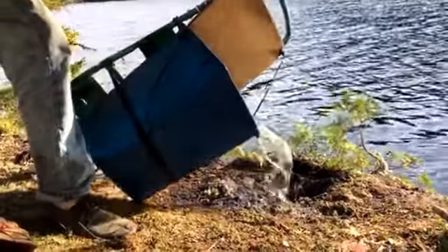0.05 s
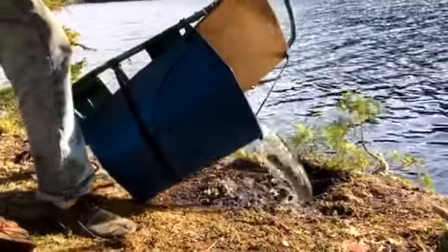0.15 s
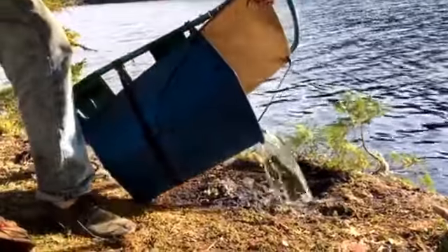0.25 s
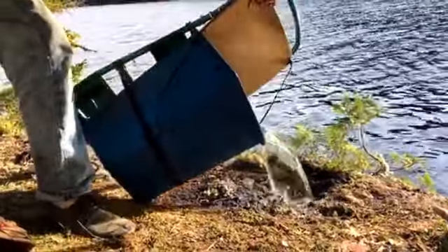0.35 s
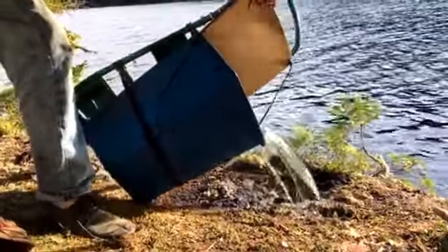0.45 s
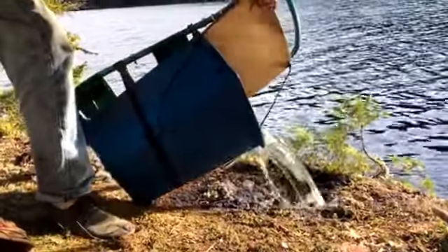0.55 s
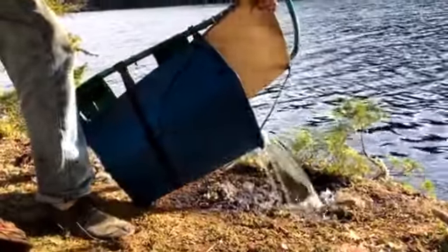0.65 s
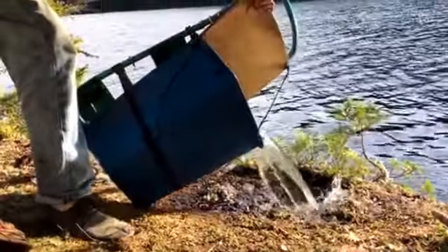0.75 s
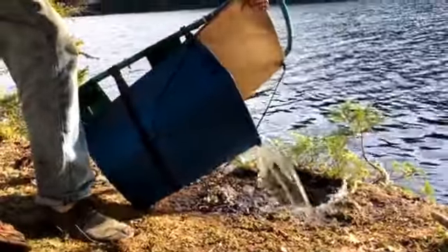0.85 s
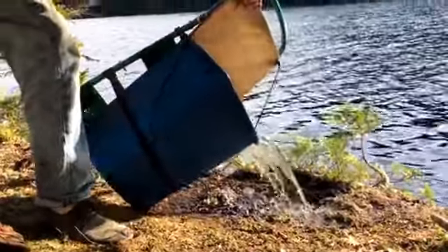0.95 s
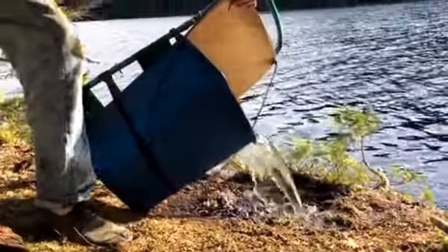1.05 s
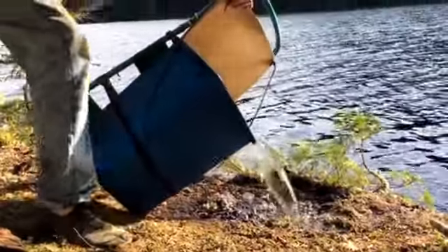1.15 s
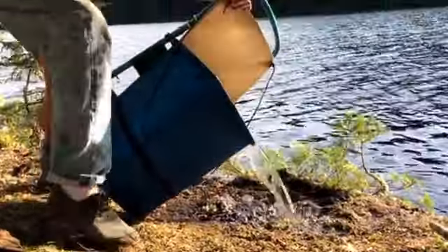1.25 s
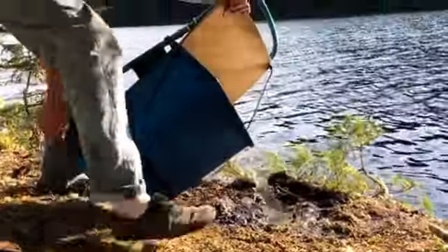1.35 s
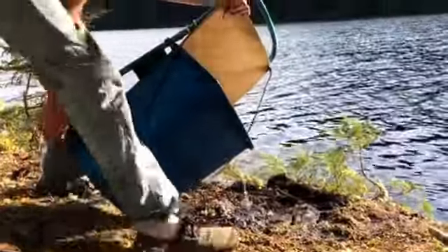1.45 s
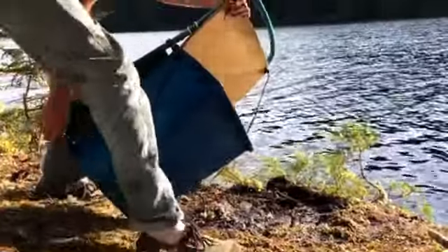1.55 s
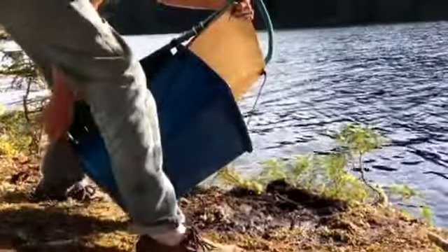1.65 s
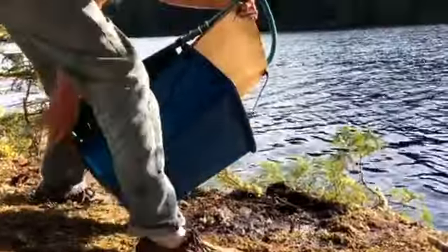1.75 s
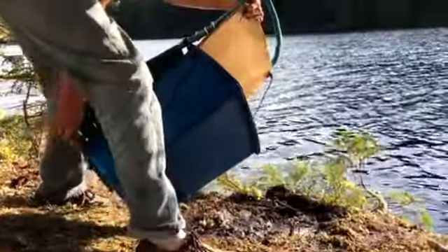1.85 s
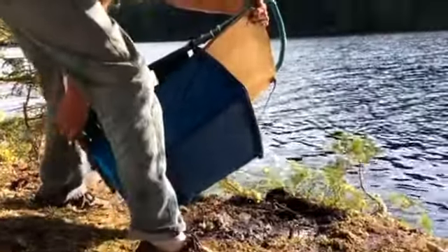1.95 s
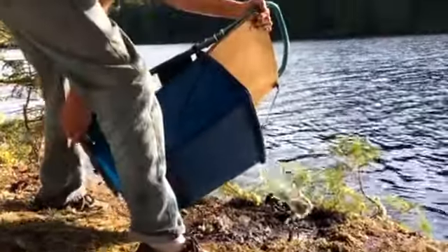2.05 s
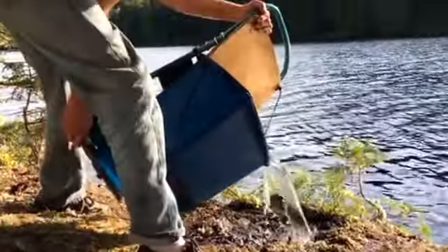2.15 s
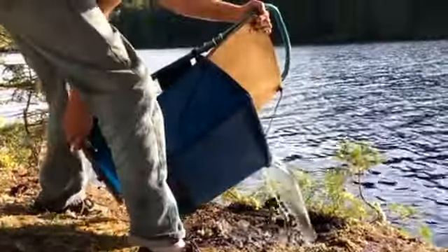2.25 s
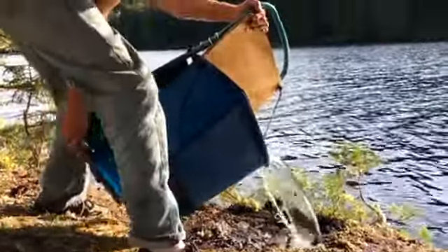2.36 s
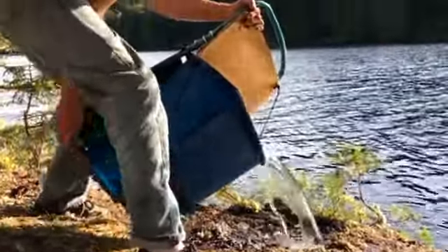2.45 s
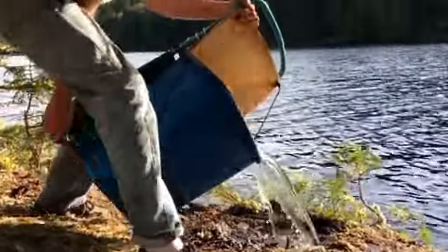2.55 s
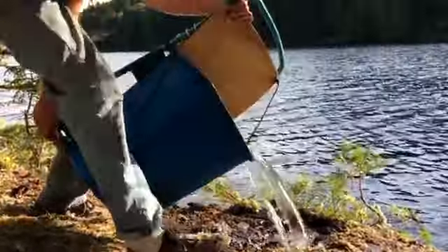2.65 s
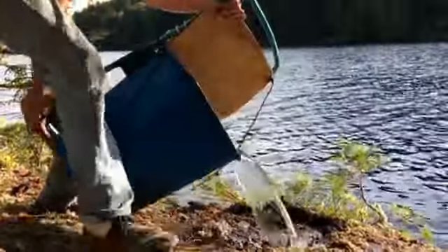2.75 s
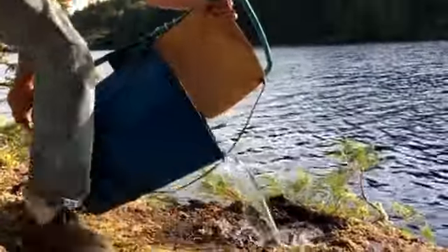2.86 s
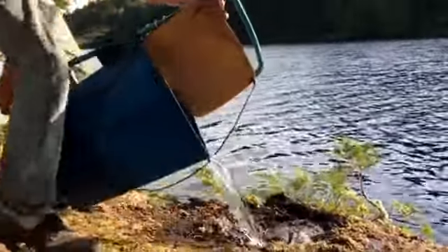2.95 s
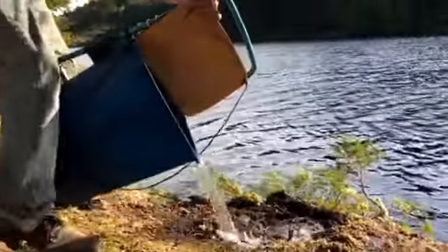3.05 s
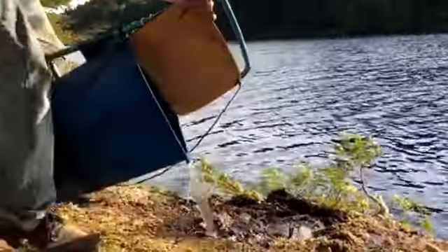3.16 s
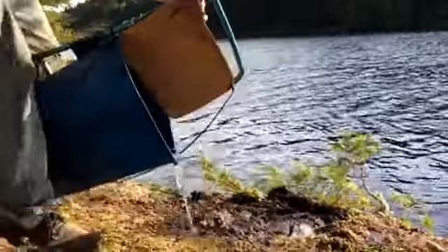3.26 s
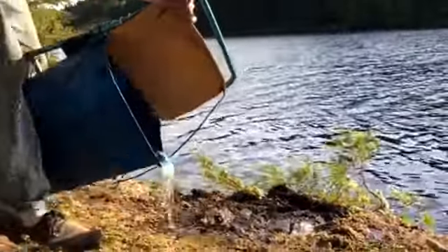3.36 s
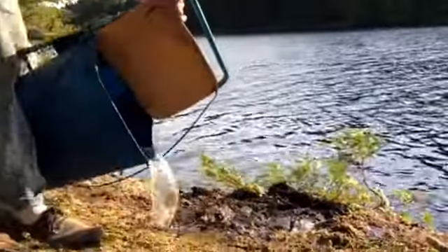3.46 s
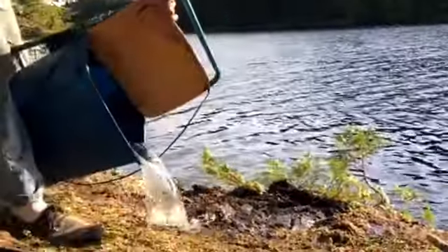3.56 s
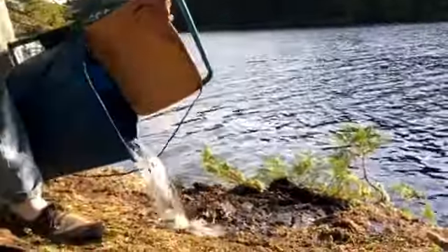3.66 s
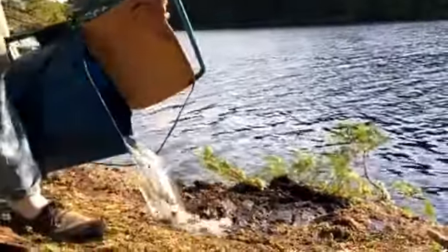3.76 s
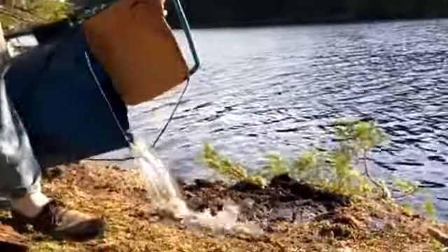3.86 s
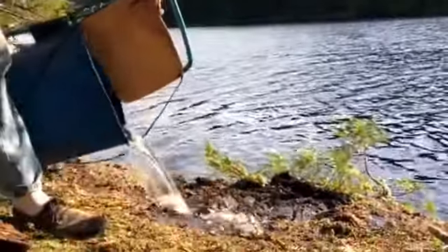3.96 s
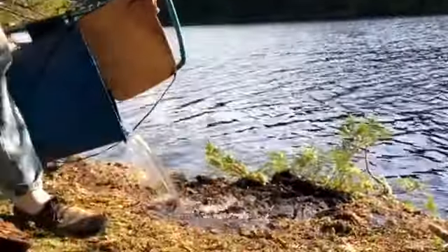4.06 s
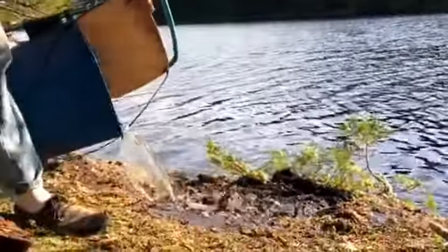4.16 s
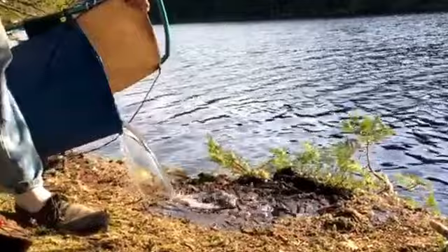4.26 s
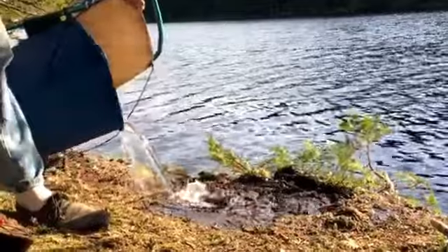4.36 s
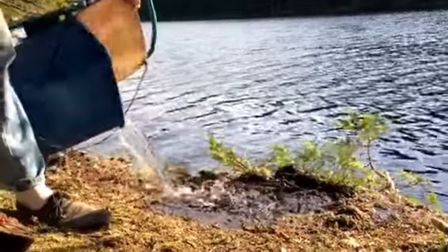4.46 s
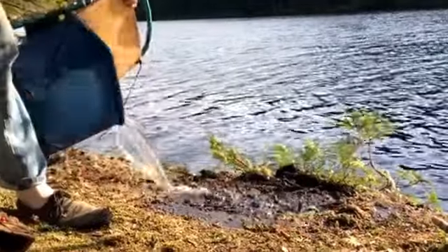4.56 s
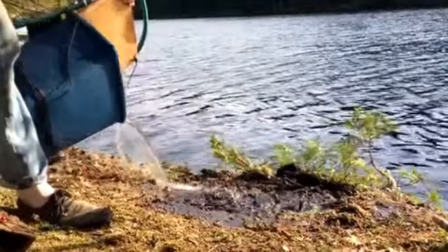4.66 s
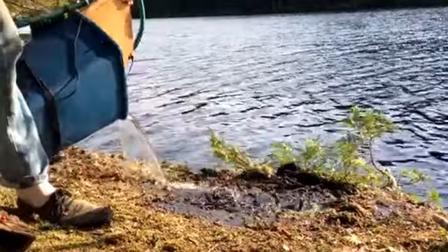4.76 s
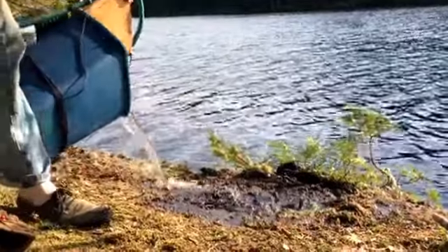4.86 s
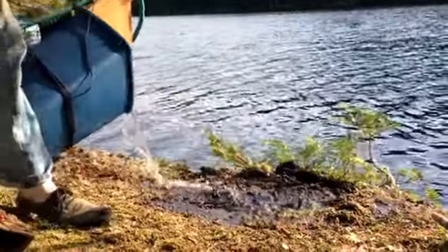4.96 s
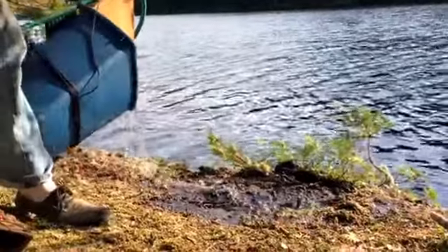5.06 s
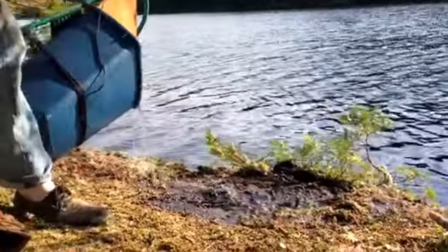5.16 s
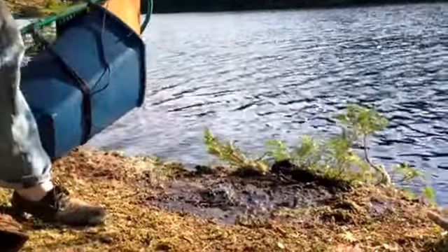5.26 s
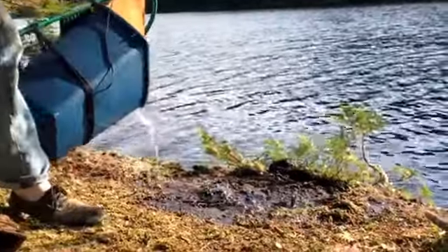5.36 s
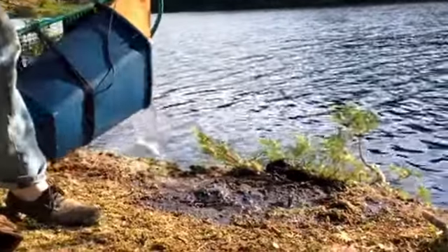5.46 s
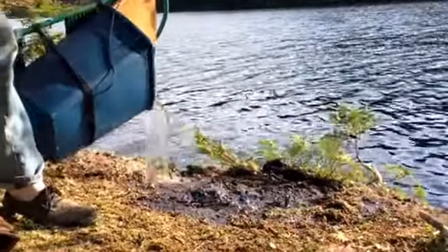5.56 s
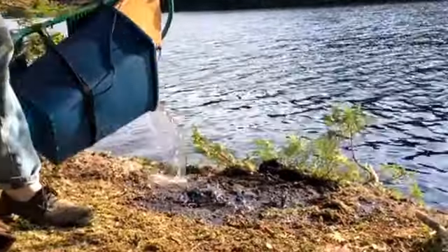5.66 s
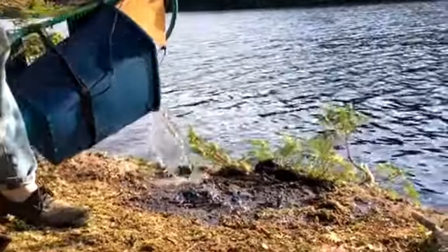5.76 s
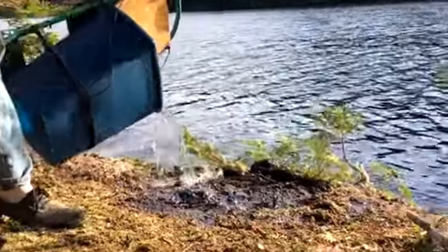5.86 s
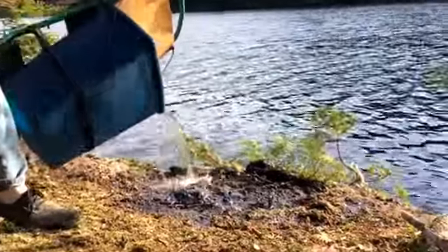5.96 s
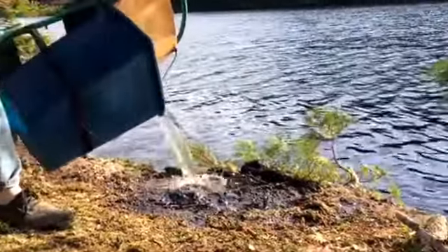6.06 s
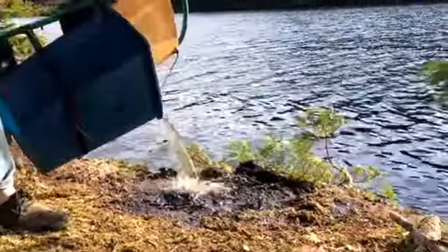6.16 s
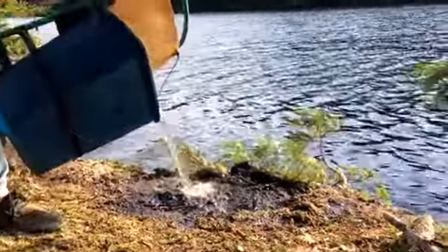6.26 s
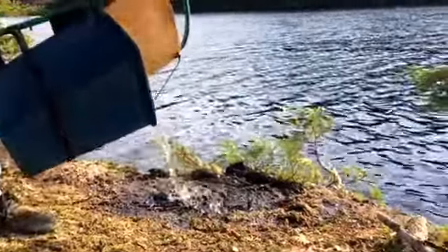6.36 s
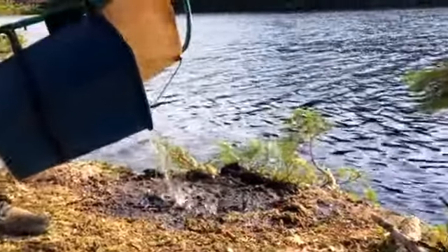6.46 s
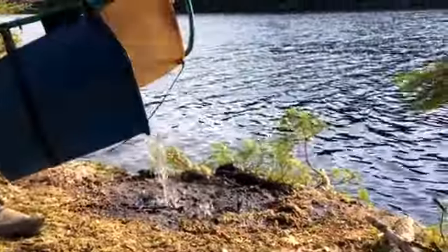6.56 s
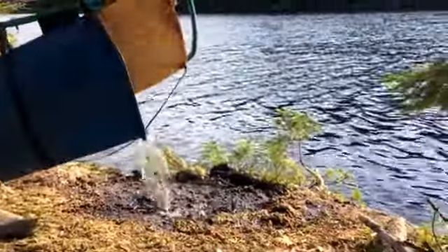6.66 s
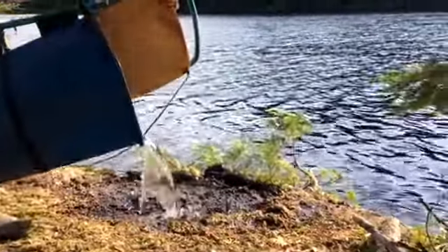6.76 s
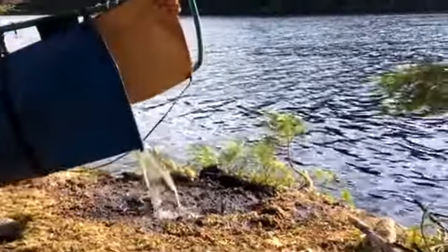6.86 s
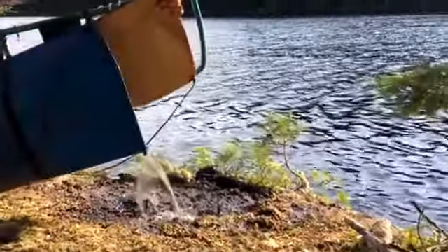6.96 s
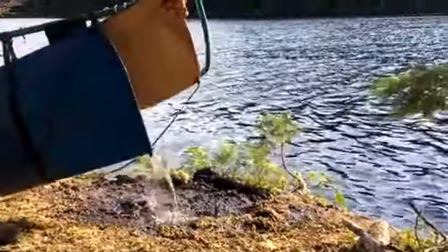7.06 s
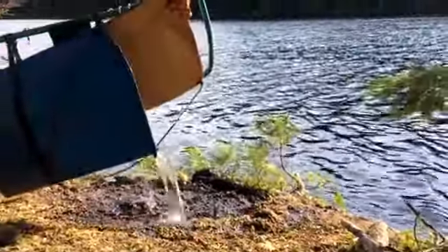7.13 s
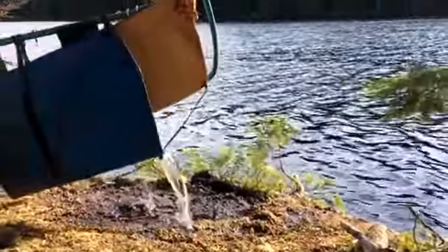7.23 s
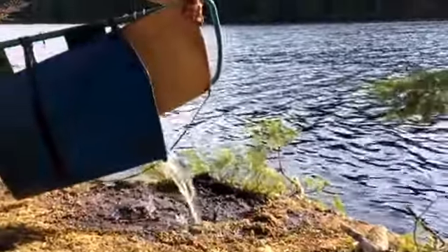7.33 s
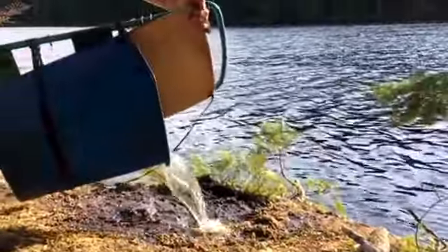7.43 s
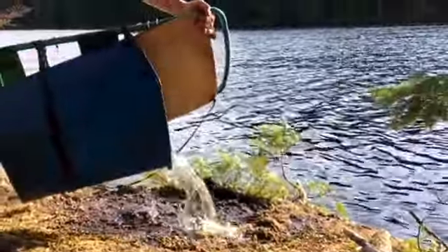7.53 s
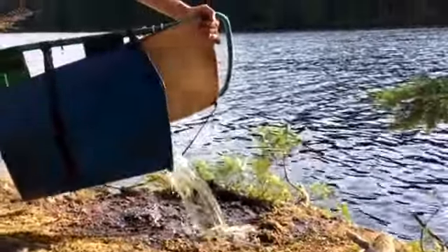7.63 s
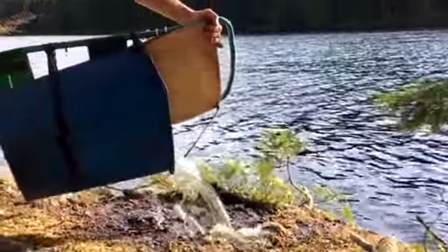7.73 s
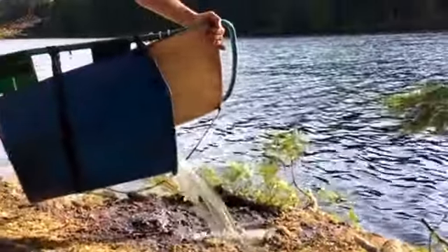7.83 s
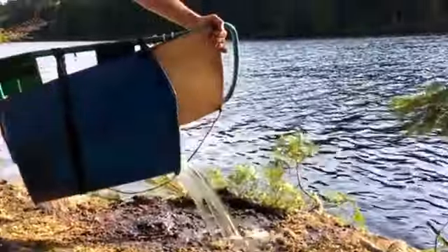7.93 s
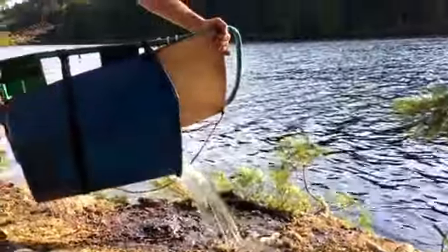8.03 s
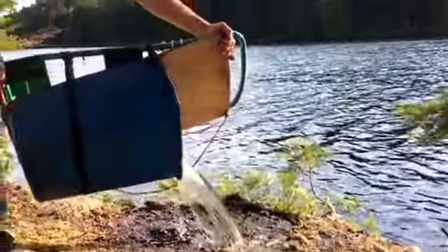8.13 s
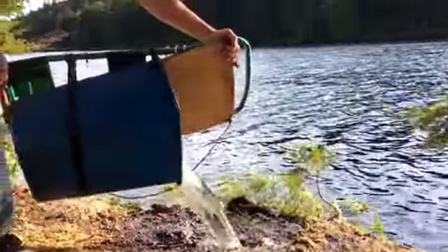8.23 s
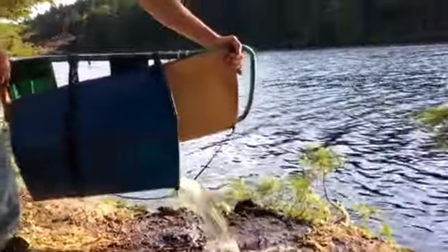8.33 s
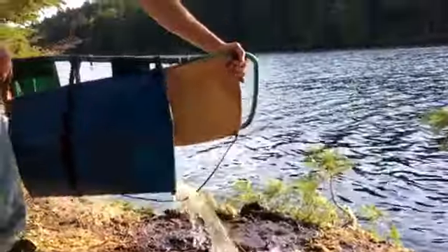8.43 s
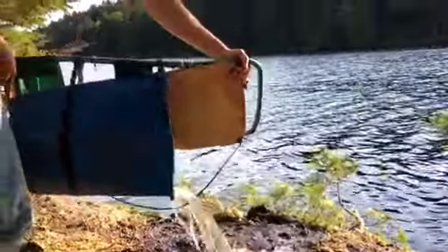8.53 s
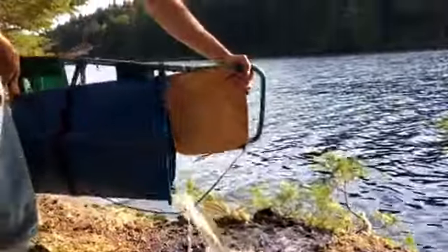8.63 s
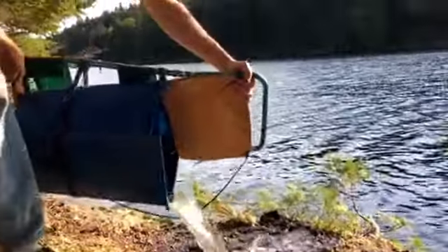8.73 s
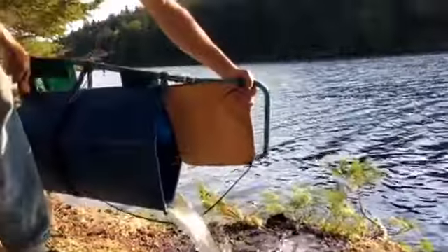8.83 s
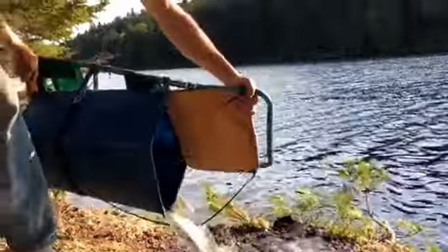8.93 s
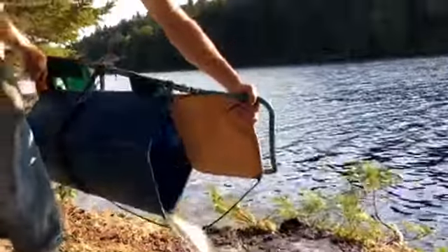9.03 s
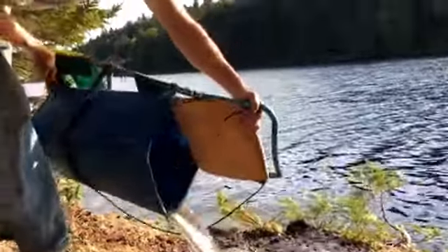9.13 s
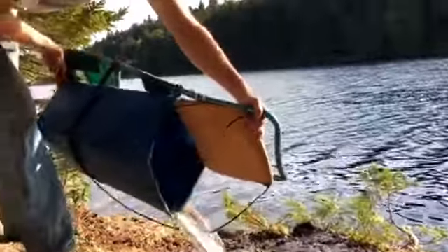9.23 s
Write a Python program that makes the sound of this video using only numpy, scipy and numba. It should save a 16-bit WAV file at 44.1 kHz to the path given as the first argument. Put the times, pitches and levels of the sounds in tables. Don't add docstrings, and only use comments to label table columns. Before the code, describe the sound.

Outdoors on a dry, open lake shore, water is tipped from a large box onto wet ash and mud about two metres away. From 0 to 1.5 s a modest, spattering stream bubbles and patters, then thins to drips and near silence by 1.8 s. At 2.2 s a sharp wet slap opens a fuller, gurgling surge, with a low bump at 2.9 s; it dwindles to plops by 3.4 s. A third pour runs from 3.5 to 5.1 s, then sparse ticks and drips. A deep bump at 5.4 s precedes the fourth, lively with big plops around 5.6-6.2 s, breaking into scattered drops until 7.2 s. After a light double bump at 7.3 s, the fifth pour builds, fullest near 8.7 s, and continues to 9.29 s, where one short, hard knock lands. Faint wind and handling thuds and a very quiet ripple hiss remain underneath.

```python
import sys
import numpy as np
from scipy import signal
from scipy.fft import rfft, irfft
from scipy.io import wavfile
from scipy.ndimage import uniform_filter1d
from numba import njit

SR = 44100
rng = np.random.default_rng(int(sys.argv[2]) if len(sys.argv) > 2 else 0)


def wrap_up_sound(samples):
    columns = np.atleast_2d(samples).T
    tamed = np.clip(columns, -1, 1)
    steps = np.round(tamed * 32767).astype(np.int16)
    wavfile.write(sys.argv[1], SR, steps)


def amplitude_ratio(level_db):
    exponent = np.asarray(level_db, float) / 20
    return 10 ** exponent


N = 409688


def curve(table, column):
    rows = np.array(table)
    return np.interp(np.arange(N) / SR, rows[:, 0], rows[:, column])


def sample_at(seconds):
    return (seconds * SR).astype(np.int64)


def unit(x):
    return x / np.sqrt(np.mean(x ** 2))


def smooth_twice(x, size):
    return uniform_filter1d(uniform_filter1d(x, size), size)


def colour(x, points):
    hz, db = np.transpose(points)
    f = np.maximum(np.fft.rfftfreq(len(x), 1 / SR), 1)
    gain_db = np.interp(np.log(f), np.log(hz), db)
    return irfft(rfft(x) * amplitude_ratio(gain_db), len(x))


def walk(rate):
    hold = int(SR / rate)
    steps = np.repeat(rng.standard_normal(N // hold + 1), hold)
    return unit(smooth_twice(steps, hold)[:N])


def bumps(peak_s, length_s, size, rise):
    out, t = np.zeros(N), np.arange(N) / SR
    for s, long, height in zip(peak_s, length_s, size):
        near = slice(max(int((s - 4 * long) * SR), 0), int((s + 4 * long) * SR))
        lag = (t[near] - s) / long
        lag = np.where(lag < 0, lag / rise, lag)
        out[near] += height * np.exp(-lag ** 2)
    return out


@njit
def ring(start, hz, cycles, rise, size, length):
    out = np.zeros(length)
    for k in range(len(start)):
        step = 2 * np.pi * hz[k] / SR
        life = cycles[k] * SR / hz[k]
        fade, glide = np.exp(-2 / life), np.exp(rise[k] / life)
        gain, phase, swell = size[k], 0., 1.
        for i in range(start[k], min(length, start[k] + int(3 * life))):
            out[i] += gain * (1 - swell) * np.sin(phase)
            phase += step
            swell *= 1 - step / 10
            step = min(step * glide, 2.8)
            gain *= fade
    return out


# [f/Hz, level/dB per Hz]
WIND_COLOUR = [(20, -11.5), (35, -9), (55, 1.5), (80, -2.5), (110, -13.5), (160, -17), (250, -33),
               (500, -50)]
# [f/Hz, level/dB]
RIPPLE_COLOUR = [(80, -30), (120, -2), (160, -5), (230, -9), (320, -12), (450, -16), (1620, -24.5),
                 (4880, -37.5), (6110, -28.5), (16000, -34)]
# [peak t/s, length/s, peak level/dB]
GUSTS = [(1.084, 0.057, -54.5), (1.42, 0.16, -65), (2.967, 0.058, -55), (3.139, 0.016, -58),
         (3.32, 0.045, -62), (3.88, 0.046, -65), (4.083, 0.025, -65), (5.441, 0.028, -42),
         (6.328, 0.025, -53), (6.56, 0.16, -44.5), (6.682, 0.081, -59), (7.615, 0.039, -59),
         (8.037, 0.045, -65), (8.66, 0.037, -67), (8.82, 0.11, -58.5), (9.06, 0.076, -57),
         (9.264, 0.15, -55)]


def air():
    s, long, db = np.transpose(GUSTS)
    breeze_db, swing_db, ripple_db = -67, 5, -68
    breeze = amplitude_ratio(breeze_db + swing_db * np.clip(walk(9.9), -1.2, .8))
    force = breeze + bumps(s, long, amplitude_ratio(db), rise=0.66)
    wind = unit(colour(rng.standard_normal(N), WIND_COLOUR)) * force
    ripples = amplitude_ratio(.4 * walk(12)) * rng.standard_normal(N)
    return wind + unit(colour(ripples, RIPPLE_COLOUR)) * amplitude_ratio(ripple_db)


# [t/s, peak level/dB, f/Hz]
THUDS = [
    (1.577, -59, 262),
    (2.193, -49, 113),
    (2.945, -42.5, 98),
    (5.428, -41, 81),
    (5.63, -53, 129),
    (5.95, -54, 130),
    (7.322, -55, 190),
    (7.345, -55, 200),
]


def thuds():
    s, db, hz = np.transpose(THUDS)
    return ring(sample_at(s), 1.34 * hz, 2.0 + 0 * s, -.3 + 0 * s, amplitude_ratio(db + 19.0), N)


# [f/Hz, peak level/dB, life/cycles]
WALL_MODES = [
    (3100, -18.5, 3),
    (1500, -23, 2.5),
]


def knock():
    knock_s = 9.2792
    hz, db, cycles = np.transpose(WALL_MODES)
    return ring(np.full(len(hz), int(knock_s * SR)), hz, cycles, 0 * hz, amplitude_ratio(db), N)


def crackle(count=1400):
    when, pitch, size = rng.random((count, 3)).T
    start = sample_at(when * N / SR)
    spray_db = pour()[3][start]
    db = spray_db + 15 + 4.0 * np.minimum(-np.log(size), 3.3)
    hz = 2200 * 4.5 ** pitch
    return ring(start, hz, 1.1 + 0 * size, 0 * size, amplitude_ratio(db) * (spray_db > -70), N)


# [t/s, peak level/dB, f/Hz]
LONE_BUBBLES = [(0.257, -39, 4180), (0.495, -38, 3230), (0.76, -37.5, 1670), (1.131, -40.2, 3060),
                (1.419, -39, 2280), (2.445, -35.5, 1570), (2.513, -39.6, 3770), (2.71, -36, 2480),
                (2.902, -36, 1480), (2.932, -36.6, 1980), (3.014, -38, 3190), (4.01, -36.6, 930),
                (4.032, -37, 850), (4.068, -36, 4070), (4.735, -39, 1540), (7.243, -45, 900),
                (5.84, -33, 2210), (6.008, -41, 4480), (6.067, -33, 2620), (6.135, -35.1, 1450),
                (7.613, -37, 2470), (7.816, -39, 2930), (7.925, -39, 1450), (8.07, -40, 2930),
                (8.362, -37, 3500), (8.47, -35, 3140), (8.491, -36, 3450), (8.492, -35, 4300),
                (8.517, -36.8, 1960), (8.635, -34, 1680), (8.705, -32, 2780), (8.727, -35.1, 3700),
                (8.85, -36.2, 2000), (8.872, -38, 1980), (9.12, -38, 3380)]
# [peak t/s, length/s, f/Hz, level/dB]
CHAINS = [(0.48, 0.08, 4000, -60), (0.641, 0.066, 3600, -55), (0.658, 0.049, 623, -55.5),
          (0.751, 0.038, 520, -60.5), (0.767, 0.069, 1710, -59), (0.897, 0.071, 2220, -55),
          (0.89, 0.095, 3960, -51), (1.085, 0.058, 2150, -58), (1.097, 0.046, 940, -54),
          (1.171, 0.05, 2150, -53), (1.211, 0.091, 1070, -54.5), (1.303, 0.08, 2220, -53),
          (1.46, 0.04, 2200, -55), (2.405, 0.075, 1100, -49.5), (2.588, 0.089, 865, -52),
          (2.65, 0.07, 2600, -54.0), (2.923, 0.023, 1300, -51), (2.94, 0.031, 1900, -54.5),
          (3.145, 0.012, 1500, -61), (3.19, 0.025, 2200, -59), (3.863, 0.035, 1340, -54),
          (3.935, 0.074, 2380, -55.0), (3.952, 0.04, 940, -56), (4.089, 0.077, 885, -59),
          (4.228, 0.068, 1210, -53), (4.9, 0.08, 1640, -56), (5.835, 0.039, 2240, -49),
          (5.927, 0.11, 1230, -48), (6.078, 0.085, 1440, -61), (6.15, 0.02, 1750, -48),
          (6.725, 0.08, 4470, -60.0), (7.574, 0.08, 2470, -60), (7.585, 0.08, 1580, -60),
          (8.002, 0.087, 1550, -52.0), (8.05, 0.047, 690, -54), (8.143, 0.09, 2920, -47.5),
          (8.301, 0.074, 3590, -49.5), (8.327, 0.096, 1690, -49), (8.419, 0.08, 3070, -54),
          (8.66, 0.07, 1740, -52), (8.805, 0.08, 3800, -58), (8.85, 0.064, 1800, -45),
          (9.28, 0.074, 1460, -54)]


def pockets():
    s, db, hz = np.transpose(LONE_BUBBLES)
    lone = ring(sample_at(s), hz, 0.0034 * hz + 5.8, .03 + 0 * s, amplitude_ratio(db + 4.5), N)
    s, long, hz, db = np.transpose(CHAINS)[:, :, None]
    when, pitch, size = np.moveaxis(rng.standard_normal((len(s), 24, 3)), 2, 0)
    start = np.clip((s + .7 * long * when) * SR, 0, N - 1).astype(np.int64).ravel()
    hz = (hz * (1 + .04 * pitch)).ravel()
    gain = amplitude_ratio(db + 5.5 + 2.2 * size).ravel()
    return lone + ring(start, hz, 0.0049 * hz + 5.7, 0.024 + 0 * hz, gain, N)


# [t/s, peak level/dB, f/Hz, life/cycles]
PLOPS = [(0.037, -39.5, 1670, 13), (0.15, -37, 2220, 9.8), (0.471, -28.5, 1310, 9), (1.38, -34, 1930, 12),
         (1.407, -32, 2140, 11), (1.566, -31.5, 2030, 4.8), (2.251, -25.5, 930, 5), (2.319, -26, 1750, 7.7),
         (2.348, -31, 1830, 9), (3.396, -36, 1138, 16), (3.554, -29, 2500, 8.9), (3.708, -27.5, 1524, 9.7),
         (4.644, -22, 1370, 2.6), (5.647, -24.5, 2850, 9), (5.748, -23, 2700, 10.6),
         (5.788, -24, 2620, 8.2), (5.841, -20, 1090, 3.9), (5.949, -20, 1940, 6), (6.136, -25.5, 2206, 13),
         (6.177, -29, 2200, 9), (6.216, -18, 1900, 4.7), (6.498, -28.5, 2390, 5), (6.611, -26, 2680, 4.9),
         (6.864, -32, 2030, 8.1), (7.308, -38, 1450, 7.9), (7.477, -26.5, 2130, 3.5),
         (8.079, -29.5, 656, 8.4), (8.344, -25.5, 1710, 9.2), (8.906, -22, 1420, 6.4),
         (9.004, -27, 1290, 6.5),
         (0.17, -43, 1100, 14), (0.55, -42, 820, 12), (0.659, -41, 640, 11), (0.745, -43.5, 540, 14),
         (2.087, -52, 1640, 12), (3.419, -38, 1480, 14.4), (3.439, -50, 1700, 13), (5.412, -48, 1350, 12),
         (6.997, -39, 700, 4.7), (3.555, -26.5, 1380, 4.3), (6.143, -25, 1080, 11.7),
         (7.86, -26.5, 910, 5.1), (7.95, -28.5, 1020, 18), (1.595, -38, 900, 3.5), (4.565, -32.5, 1630, 17),
         (4.235, -32.5, 1300, 13), (3.4, -40, 1600, 20)]


def plops():
    s, db, hz, cycles = np.transpose(PLOPS)
    cycles = np.maximum(cycles, 1)
    lag, ratio = rng.random((len(s), 2)).T
    start = sample_at(s)
    first = ring(start, hz, cycles, 0.019 + 0 * s, amplitude_ratio(db - 2.5), N)
    smack = ring(start, hz * 0.97, 1.8 + 0 * s, -.2 + 0 * s, amplitude_ratio(db - 6), N)
    after = sample_at(s + 0.001945 + 0.00599 * lag)
    after_hz = hz * (0.818 + 0.347 * ratio)
    neighbour = ring(after, after_hz, cycles * 1.1, 0.078 + 0 * s, amplitude_ratio(db - 9.5), N)
    return first + smack + neighbour


# [t/s, peak level/dB, centre f/Hz]
SLAPS = [(0.0368, -36, 6040), (0.1496, -39, 2860), (7.4934, -35, 3240), (0.2798, -38, 3900),
         (0.5626, -34.5, 3770), (1.2999, -39, 3970), (1.3578, -36, 3950), (1.4501, -36, 7050),
         (1.5254, -36, 4950), (1.5643, -34.5, 8000), (1.6611, -32, 5800), (2.1889, -23, 6460),
         (2.7013, -30, 7360), (3.5573, -32, 3800), (3.6671, -32, 3940), (5.6052, -35, 2680),
         (5.6461, -30, 3470), (5.7349, -29, 5340), (6.0916, -38, 3450), (6.1384, -27, 3070),
         (6.189, -31, 5000), (6.3096, -30, 4660), (6.761, -34.5, 4200), (6.8428, -30.5, 7800),
         (7.5577, -33.5, 3480), (7.7353, -28, 4300), (6.7422, -42, 4620), (8.4936, -30, 3420),
         (8.5255, -27.5, 3620), (8.7296, -31, 3640),
         (1.5957, -43, 5700), (1.6028, -48, 8720), (1.625, -46, 2920), (1.674, -49, 5420), (1.7, -54, 8840),
         (3.405, -41.5, 4130), (5.282, -41.5, 4200), (5.3173, -43, 9800), (6.271, -40, 6000),
         (6.464, -36, 5200), (6.6302, -34.5, 3050), (6.674, -39, 4500), (6.9591, -36, 8100),
         (7.1965, -40, 3120), (7.3424, -33.5, 2720), (2.202, -38, 3920), (5.236, -44, 5310),
         (5.2534, -51, 3920), (5.331, -46, 4050), (5.3892, -54, 3470), (5.4486, -50, 2930),
         (5.471, -46, 3360), (5.5393, -46, 2900), (6.413, -45, 3660), (6.7738, -36, 4350),
         (6.8842, -37, 2500), (7.123, -45, 3400), (0.474, -38, 1930), (0.983, -37, 1000), (3.07, -46, 2200),
         (3.118, -39, 5800), (3.195, -38, 2500), (3.238, -44, 2280), (6.336, -39, 3600), (6.697, -45, 3400),
         (6.752, -44, 4200), (5.973, -35, 5900),
         (2.182, -48, 4000),
         (6.2623, -38, 4130), (0.245, -35, 11500), (0.301, -38, 4260), (0.4343, -37, 4550),
         (0.537, -37, 4000), (0.8291, -33.5, 11410), (0.9234, -36.5, 3830), (0.949, -35, 6160),
         (1.3014, -33.5, 3950), (2.4793, -34.5, 4310), (6.4349, -39, 4990), (3.0066, -36, 5170),
         (3.442, -48, 1510), (4.5884, -39, 6800), (5.188, -40, 2520), (5.2449, -44, 6400),
         (5.4562, -44.5, 5860), (5.559, -42.5, 3320), (5.673, -36, 2450), (5.724, -37, 3660),
         (5.803, -31, 3620), (5.8568, -33, 2580), (5.9996, -33, 9130), (6.0921, -32, 4780),
         (6.188, -28.5, 2410), (6.4541, -37, 3500), (6.5847, -38, 9730), (6.6532, -42, 9130),
         (7.0763, -40.5, 6420), (7.147, -42.5, 6400), (6.5227, -43, 2990), (7.8035, -35, 4310),
         (8.0028, -38, 4520), (8.1478, -36.5, 2930), (8.6547, -34, 3680), (8.779, -32, 5940),
         (6.9258, -42, 2260), (6.598, -41, 3800), (6.54, -43, 3000), (5.36, -46, 7200), (5.262, -47, 7300),
         (5.596, -40, 5800), (6.363, -42, 10000), (6.32, -39, 4200)]


def slaps():
    size = 2048
    out, t = np.zeros(N + size), np.arange(size) / SR
    rows = SLAPS
    for (s, db, hz), noise in zip(rows, rng.standard_normal((len(rows), size))):
        decay_s = 0.0012 * amplitude_ratio(0.25 * (db + 33))
        burst = noise * (t / decay_s) ** 0.72 * np.exp(-t / decay_s)
        burst[20] += 1.5
        narrow = np.clip(1.5 - 0.045 * (db + 46.5), .2, 1.2)
        tone = colour(burst, [(hz / 8, -40 * narrow), (hz / 3, -28 * narrow), (hz / 1.35, -11 * narrow), (hz, 0),
                              (hz * 1.26, -10 * narrow), (20000, -32 * narrow)])
        i = int(s * SR)
        out[i:i + size] += amplitude_ratio(db + 2.0) * tone / np.abs(tone).max()
    return out[:N]


# [t/s, flow level/dB, thickness of the stream/dB]
TIP_1 = [(0, -53.5, -12), (.13, -64.5, -6), (.2, -54.5, -6), (.62, -51, -4), (1.09, -53, -0.5),
         (1.33, -55, -7.5), (1.5, -56, -5), (1.6, -66, -1), (1.76, -75.5, -4)]
TIP_2 = [(2.188, -79, -3), (2.199, -45, -9), (2.29, -51, -1), (2.626, -44, -1), (2.92, -52, -0.5),
         (3.04, -51, -12.5), (3.25, -60, -11.5), (3.38, -66, -8), (3.5, -68.5, -6)]
TIP_3 = [(3.52, -63, -11), (3.6, -51, -6.5), (3.82, -55, 4), (4.02, -48.5, 1), (4.34, -51, -3.5),
         (4.89, -50, -6.5), (5.12, -55.5, -8.5), (5.35, -61.5, -9.5), (5.54, -60.5, -18)]
TIP_4 = [(5.56, -59, -9), (5.61, -49, -9), (5.82, -47.5, -3.5), (6.05, -49, -3.5), (6.11, -50, -13),
         (6.24, -48.5, -8.5), (6.53, -56, -11), (6.85, -52.5, -4.5), (7.24, -60.5, -3)]
TIP_5 = [(7.27, -63.5, -2.5), (7.33, -60, 2.5), (7.38, -62, -4), (7.48, -50.5, -7.5), (7.94, -52.5, 2),
         (8.04, -52.5, 2), (8.76, -43, -2.5), (8.81, -47.5, 0), (9.29, -50.5, 1.5)]
# [t/s, depth/dB, height/dB]
GROUND = [(0, -2.5, -3), (.7, -5.5, -3.5), (1.5, -6, -1.5), (2.3, -14.5, -3), (2.7, -17.5, -5.5),
          (3.3, 7, -1.5), (3.9, -18, -4), (4.9, -17, -4), (5.4, 3, -3.5), (5.9, -21, -2), (6.5, -25, -3.5),
          (7, -6, -8), (7.4, -12, -8), (7.7, -16, -3), (8.2, -8.5, -7.5), (8.8, -20, -6), (9.29, -12, -7)]
# [peak t/s, length/s, splash level/dB, glug level/dB]
SLUGS = [(0.154, 0.1, 6, -7), (0.504, 0.014, 6.5, 6), (0.638, 0.082, 3.5, -0.5), (0.767, 0.075, 1, 0),
         (0.898, 0.093, 3.5, -6), (1.127, 0.12, 6, -2.5), (1.41, 0.064, 5.5, -14), (2.264, 0.04, 3.5, -9),
         (2.33, 0.016, -6, -4), (2.362, 0.043, 3, 1.5), (2.598, 0.22, -1.5, 8.5), (2.941, 0.089, 4.5, -1),
         (3.205, 0.14, 7.5, -9), (3.405, 0.014, 11, -15), (3.55, 0.0081, 6, 8), (4.014, 0.074, 2, 8),
         (5.837, 0.077, 5, -2), (6.005, 0.043, 4.5, 13.5), (6.153, 0.071, 11, -16.5),
         (7.006, 0.016, 7.5, 2), (6.385, 0.02, -3, 0), (6.558, 0.018, -6, 0), (6.665, 0.01, -6, 0),
         (6.727, 0.011, -5, 0), (5.44, 0.015, -5, 0), (6.25, 0.014, -7, 0), (7.318, 0.027, 5.5, -6),
         (7.46, 0.038, -2, -18), (7.53, 0.023, -7.5, 17), (7.852, 0.027, 3.5, 3), (7.89, 0.017, -1, 6),
         (7.924, .05, 5, -1), (8.075, 0.11, 2, 5), (8.64, 0.035, -2, 10.5), (8.866, 0.13, 3, 1),
         (9.218, 0.026, 3.5, -2)]
# [offset level/dB, share of thickness, share of a slug's splash]
SPRAY = (0.77, 0.013, 0.56)
PATTER = (2.53, 0.4, 1)
LARGE = (0.09, 1.075, 1)


def pour():
    tips = TIP_1 + TIP_2 + TIP_3 + TIP_4 + TIP_5
    s, long, splash_db, glug_db = np.transpose(SLUGS)
    slug_rise = 0.76
    flow, thick = curve(tips, 1), curve(tips, 2)
    splash = bumps(s, long, splash_db, slug_rise)
    large, patter, spray = (flow + db + share * thick + slug * splash
                            for db, share, slug in (LARGE, PATTER, SPRAY))
    gurgle = large + curve(GROUND, 1) + bumps(s, long, glug_db, slug_rise)
    return gurgle, large, patter, spray


def bursts(count, decay_ms, spread_db):
    kicks = np.zeros(N)
    where = rng.integers(0, N, count)
    kicks[where] = amplitude_ratio(spread_db * np.clip(rng.standard_normal(count), -2.5, 2.5)) ** 2
    decay = decay_ms * SR / 1000
    power = signal.lfilter([1], [1, -np.exp(-1 / decay)], uniform_filter1d(kicks, size=int(decay))) + 1e-9
    return unit(np.sqrt(power / smooth_twice(power, 2000)))


def swarm(count, low_hz, high_hz, cycles, rise, spread_db, froth, surge, lean_db):
    when, pitch, long = rng.random((count, 3)).T
    size = amplitude_ratio(spread_db * np.clip(rng.standard_normal(count), -2.5, 2.5))
    start = (when * N).astype(np.int64)
    hz = low_hz * (high_hz / low_hz) ** pitch
    size = size * surge[start] * amplitude_ratio(lean_db[start] * (pitch - 0.4))
    sound = ring(start, hz, cycles * (0.48 + 1.1 * long ** 3), rise * long, size, N)
    sound = unit(colour(sound, [(low_hz / 5.4, -20), (low_hz, 0), (20000, 0)]))
    noise = (0.43 + surge) * rng.standard_normal(N)
    mid_hz = np.sqrt(low_hz * high_hz)
    deep = colour(noise, [(low_hz / 4.3, -26), (low_hz, 0), (mid_hz, -4), (mid_hz * 2, -28)])
    thin = colour(noise, [(mid_hz / 1.37, -30), (mid_hz, -4), (high_hz, -3), (high_hz * 2, -26)])
    foam = amplitude_ratio(-.4 * lean_db) * deep + amplitude_ratio(0.025 * lean_db) * thin
    return unit(sound + froth * unit(foam))


# [f/Hz, level/dB]
THIN_EDGE = [(1500, -18), (2400, -1.5)]


def stream():
    gurgle_db, large_db, patter_db, spray_db = pour()
    calm = np.clip((curve(TIP_1 + TIP_2, 1) + 73) / 6, 0, 1)
    broken = calm * np.clip(1.2 + 0.15 * (-59.0 - patter_db), .55, 1.3)
    lumps = bursts(count=1500, decay_ms=7.3, spread_db=2.5) ** calm
    own = [bursts(count=1200, decay_ms=1.83, spread_db=13.5) ** (0.27 * broken) for _ in range(3)]
    neighbours = ((gurgle_db, large_db), (gurgle_db, patter_db - 0.5), (large_db, spray_db + 12.5))
    lean = [np.clip(above - below - 11, -10, 22) for below, above in neighbours]
    even = np.zeros(N)
    gurgle = swarm(count=2500, low_hz=351.0, high_hz=810, cycles=2.6, rise=0.02, spread_db=2.0,
                   froth=1.0, surge=lumps ** 1.5, lean_db=lean[0])
    large = swarm(count=6000, low_hz=811, high_hz=1754, cycles=8.0, rise=0.05, spread_db=1.0,
                  froth=0.67, surge=lumps ** 1.22, lean_db=lean[1])
    patter = swarm(count=10000, low_hz=1750, high_hz=4146, cycles=6.6, rise=0.077, spread_db=2.5,
                   froth=1.0, surge=lumps ** 0.5 * own[0], lean_db=lean[2])
    spray = swarm(count=20000, low_hz=4180, high_hz=8760, cycles=6.1, rise=0.14, spread_db=5.0,
                  froth=0.88, surge=lumps ** 0.48 * own[1], lean_db=even)
    mist = swarm(count=20000, low_hz=9000, high_hz=13650, cycles=4.2, rise=0.013, spread_db=6.5,
                 froth=0.82, surge=lumps ** 0.82 * own[2], lean_db=even)
    bubbles = amplitude_ratio(gurgle_db - 4.0) * gurgle + amplitude_ratio(large_db - 2.2) * large + amplitude_ratio(patter_db - 1.47) * patter
    thin = np.clip((spray_db - large_db - 4) / 16.5, 0, 1)
    bubbles = (1 - thin) * bubbles + thin * colour(bubbles, THIN_EDGE)
    fall = amplitude_ratio(curve(GROUND, 2) - 1.0)
    return bubbles + amplitude_ratio(spray_db - 1.9) * (spray + fall * mist)


# [t/s, lag/ms]
BOX_ECHO = [(0, 2.2), (1.2, 1.34), (2.3, 2.9), (3.5, 2.53), (5.2, 1.22), (7, 1.34), (8.2, 1.45), (9.29, 2)]
# [t/s, lag/ms, level/dB]
MUD_ECHO = [(0, 0.47, -22), (1.2, 0.5, -19), (2.6, 0.52, -22.5), (3.4, 0.51, -25), (5.2, 0.39, -25),
            (7.6, 0.493, -34), (8.4, 0.58, -16), (9.29, 0.54, -22)]


def echoes(water):
    def late(table):
        return np.interp(np.arange(N) - curve(table, 1) * SR / 1000, np.arange(N), water)
    return amplitude_ratio(-20.5) * late(BOX_ECHO) + amplitude_ratio(curve(MUD_ECHO, 2)) * late(MUD_ECHO)


def scene():
    water = stream() + slaps() + plops() + pockets() + crackle()
    return (water + echoes(water) + thuds() + knock() + air())[None]


def low_pass(x):
    return signal.sosfilt(signal.butter(12, 16460, fs=SR, output="sos"), x)


# [f/Hz, width/Hz, level/dB]
HOUSING_DIPS = [(4870, 480, -2.5), (7570, 1150, -2), (10370, 160, -10)]


def record(dry):
    f = np.fft.rfftfreq(N, 1 / SR)
    dips_db = sum(db / (1 + (2 * (f - hz) / width) ** 2) for hz, width, db in HOUSING_DIPS)
    edge_db = np.interp(f, [15800, 15900, 16400, 16500], [0, -42, -44, -80])
    mix = irfft(rfft(dry) * amplitude_ratio(dips_db + edge_db), N)
    return low_pass(mix)


dry = scene()
out = record(dry)
wrap_up_sound(out)
```